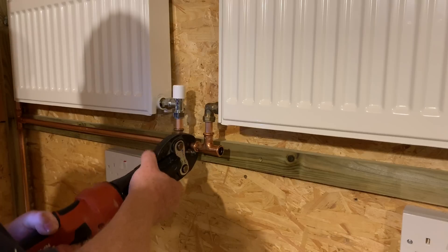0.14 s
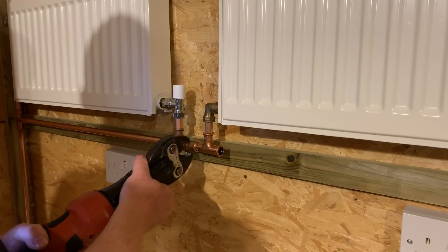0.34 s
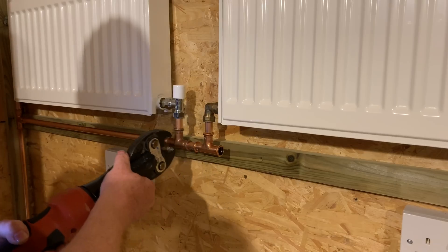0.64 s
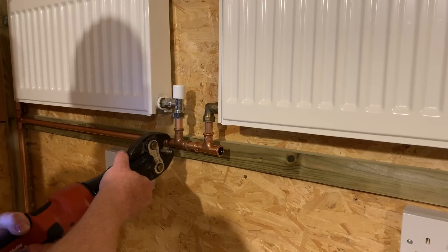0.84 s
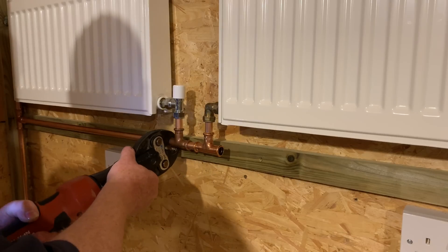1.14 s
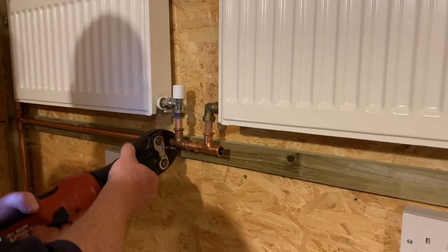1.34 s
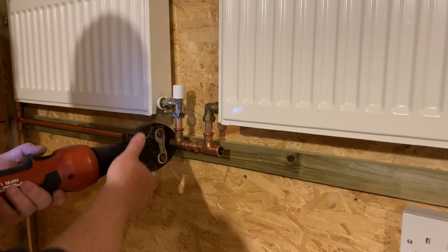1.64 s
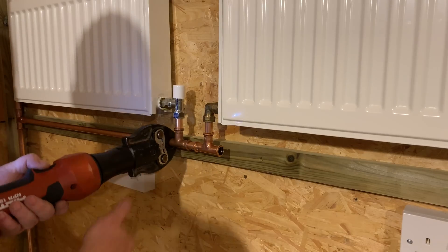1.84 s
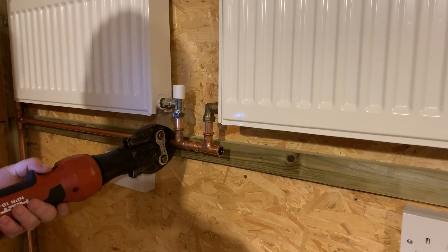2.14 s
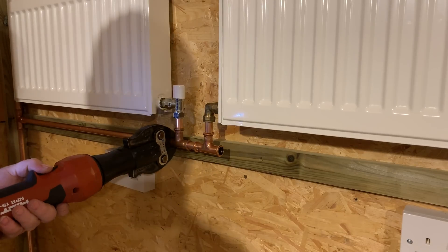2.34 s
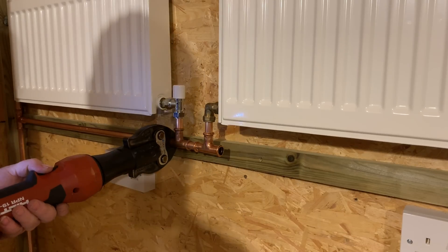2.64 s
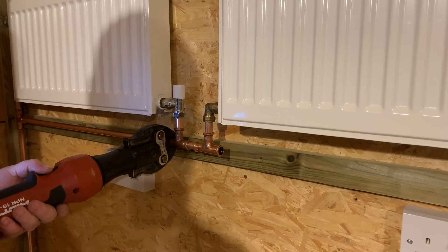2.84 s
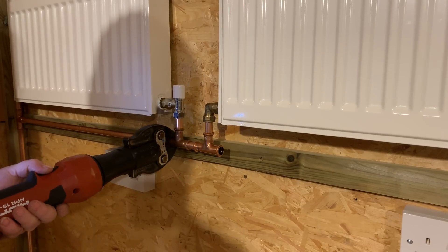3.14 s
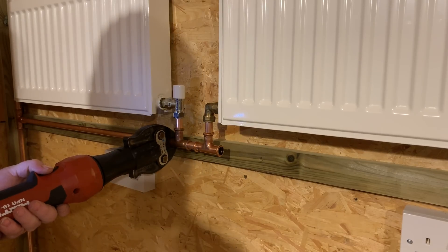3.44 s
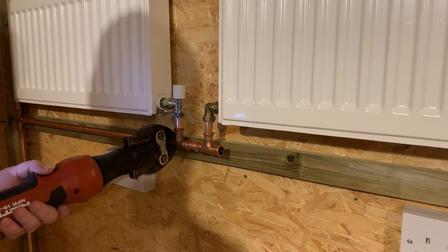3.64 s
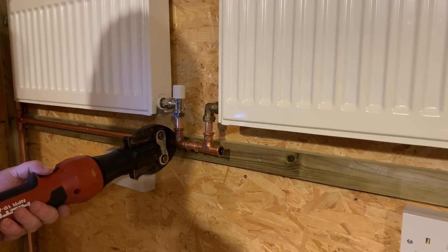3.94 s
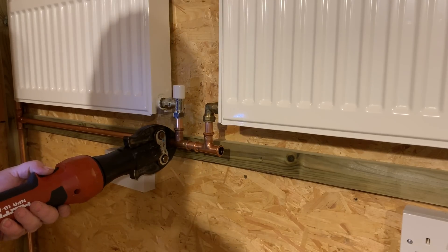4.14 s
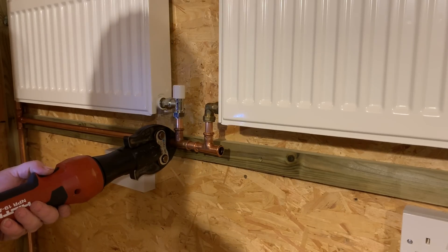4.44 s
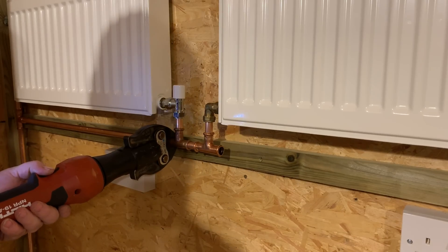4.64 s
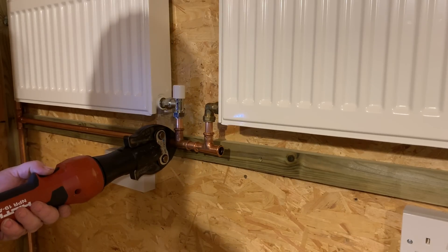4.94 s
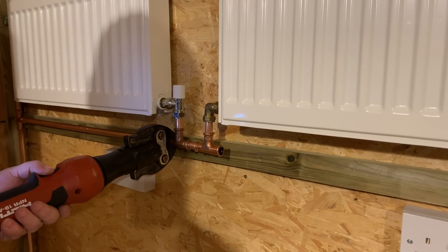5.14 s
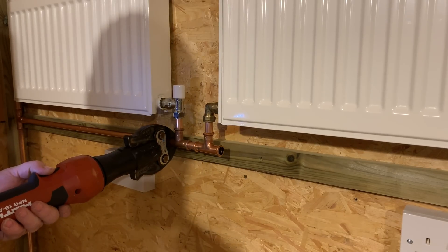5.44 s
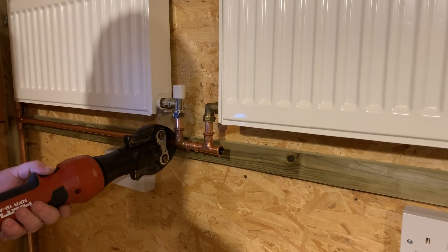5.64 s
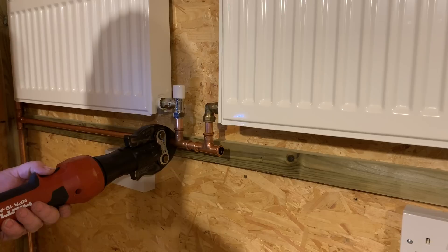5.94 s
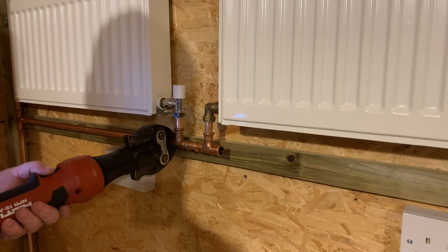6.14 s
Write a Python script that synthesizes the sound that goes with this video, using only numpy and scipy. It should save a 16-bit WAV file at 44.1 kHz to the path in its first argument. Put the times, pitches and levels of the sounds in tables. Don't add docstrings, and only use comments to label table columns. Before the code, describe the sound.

Hands rub and metal jaws knock onto copper pipe, then a battery press tool switches on and whirs with a rattling buzz, sagging under load.

```python
import sys
import numpy as np
from scipy import signal
from scipy.fft import rfft, irfft, next_fast_len
from scipy.io import wavfile
from scipy.ndimage import uniform_filter1d, map_coordinates

SR = 44100
rng = np.random.default_rng(int(sys.argv[2]) if len(sys.argv) > 2 else 0)


def volts_from_db(level):
    exponent = np.asarray(level, float) / 20
    return 10 ** exponent


def store_wav(level_fs):
    pcm = np.round(np.clip(np.atleast_2d(level_fs), -1, 1) * 32767)
    wavfile.write(sys.argv[1], SR, pcm.T.astype(np.int16))


N = 277389
T = np.arange(N) / SR

# time_s, turns_per_s
PUMP_SPEED = [(2.0, 42.83), (2.05, 56.81), (2.1, 67.45), (2.2, 68.0), (2.6, 68.0), (3.2, 67.82),
              (3.95, 67.24), (4.15, 66.36), (4.4, 66.02), (4.7, 65.96), (5.0, 65.38), (5.3, 65.33),
              (5.6, 64.85), (5.9, 65.04), (6.29, 63.82)]
# start_s, end_s
HUM_LOAD_S = [3.6, 5.4]
# multiple_of_pump_speed, light_db, loaded_db
PUMP_HUM = [(1.012, -32, -44), (2, -52, -43), (3.012, -41, -49), (4.004, -32.5, -48), (4.97, -43.5, -40),
            (5.997, -39, -31), (7.023, -41, -38.5), (7.89, -60, -62), (9, -44.5, -44.5), (10.17, -52, -40),
            (11, -44.5, -47), (12, -36.5, -38), (13, -51, -52), (14, -79, -50), (15, -46.5, -60),
            (16, -44, -52), (17, -68, -67), (18, -43, -50), (19, -39.5, -41), (20, -41, -43),
            (21, -81, -37), (22, -39, -74), (23, -49.5, -46.5), (24, -51, -49.5), (31, -39, -51),
            (34, -38.5, -40), (35, -36.5, -49), (46, -40, -43), (50, -38, -53)]
# pump_multiples_added_to_rotor_speed, light_db, loaded_db
ROTOR_HUM = [(-2, -71, -57), (-1, -45.5, -50.5), (0, -33.5, -30.5), (1, -38.5, -44), (2, -52.5, -39.5),
             (3, -47.5, -58), (4, -49, -37), (5, -67, -46), (6, -47, -45), (7, -46, -43), (8, -48, -51),
             (9, -48, -54), (11, -52, -74), (13, -56, -42.5)]
HUM_SURGES = {2: (4.75, 0.63, 7), 3: (4.7, .6, 7), 12: (4.36, 1, 4.5), 13: (4.85, 0.41, 21),
              16: (3.45, 0.27, 4.8), 19: (4.75, .35, 2)}
TOOTH_BLOWS = [
    (-.03, .045, 1.),
    (.19, .03, .35),
    (.41, .05, .5),
    (.75, .04, .12),
]
# pitch_hz, density_db_per_hz
CLATTER_FREE = [(88, -55), (150, -25.5), (266, -12.5), (316, -74), (369, -5.5), (513, -17.5), (833, -15.5),
                (940, -26), (1260, -15), (4460, -15.5), (7640, -14), (9400, -19), (12200, -41),
                (20700, -120)]
# pitch_hz, density_db_per_hz
CLATTER_LOADED = [(88, -25), (150, -23), (290, -17.5), (350, -6.5), (513, -10.5), (631, -7.5), (1450, -12),
                  (3570, -14.5), (4390, -9), (5790, -15), (7770, -12), (9400, -13.5), (12200, -45),
                  (20700, -120)]
# pitch_hz, density_db_per_hz
CLATTER_TOP = [(9750, -17), (10050, -35), (10900, -37), (11350, -29), (11750, -20), (12400, -18),
               (14000, -17), (15100, -20), (15400, -31), (15850, -33), (15950, -120)]
# pitch_hz, width_hz, level_db
FREE_RINGS = [(2050, 71, 14.5), (2327, 84, 10), (2980, 23, -16), (3284, 17, 8.5), (3940, 23, 3),
              (5120, 55, 8), (7650, 710, -2), (8030, 300, -10), (8470, 610, 12.5)]
# pitch_hz, width_hz, level_db
LOADED_RINGS = [(2050, 70, 0.5), (2550, 250, 6.5), (2978, 21, 1), (4310, 310, -3.5), (5050, 66, 3.5),
                (8030, 790, 4.5), (9200, 15, 3)]
# start_s, end_s, pitch_hz, width_hz, level_db
STRAINS = [(2.014, 2.21, 2100, 100, -39), (2, 2.18, 990, 270, -35), (2.03, 2.4, 3700, 100, -37),
           (3.04, 3.47, 600, 33, -38.5), (3.82, 4, 1008, 15, -38), (3.63, 4.12, 620, 140, -34.5),
           (3.9, 4.65, 1190, 370, -38), (3.95, 4, 2600, 270, -40), (4.3, 5.4, 2280, 100, -37),
           (5.7, 6.3, 1200, 13, -45), (5.5, 6.1, 650, 41, -42.5), (5.998, 6.7, 602, 34, -25.5),
           (5.97, 6.5, 1600, 13, -40), (6.3, 6.5, 512, 27, -35), (6.1, 6.3, 900, 36, -40)]
# pitch_hz, t60_s, rise_s, level_db
VALVE_RINGS = [(7680, .0095, .0012, 4), (7980, .011, .0012, -1), (8900, .01, .001, -16),
               (4500, .007, .0004, -5), (2600, .008, .0006, -11), (10000, .012, .0003, -22),
               (13200, .005, .0003, -14)]
# place_turns, level_db
VALVE_STROKES = [
    (-.075, 0),
    (.36, -8.5),
]
# time_s, level_db (relative to running)
SWITCH_ON = [
    (2.0, -59),
    (2.014, -24),
    (2.031, -28),
    (2.033, -3.5),
    (2.05, -6.5),
    (2.075, -1.5),
]
# time_s, half_length_s, depth_ratio, whine_db
STUMBLES = [
    (2.145, 0.062, 0.9, -12),
    (3.21, 0.058, .9, 3),
    (4.25, 1, 0.28, 3.5),
    (5.152, 0.32, 1, 1.5),
    (6.076, 0.11, 0.4, 5.5),
    (6.27, 0.26, 0, -23),
    (3.396, 0.17, 0.3, 5.5),
    (3.803, .28, 0.13, -1.5),
    (5.0, 0.15, 0, 0.5),
]
# time_s, peak_db, treble_db, centre_hz,
# scrape_s
KNOCKS = [(0.162, -34.5, -25, 780, 0.049), (0.23, -28, -2.5, 745, 0.008), (0.236, -18, -30, 840, 0.0082),
          (0.33, -44, -11, 891, 0.02), (0.593, -60, -3, 854, 0.038), (0.77, -44, -6, 900, 0.01),
          (0.779, -19.5, -14.5, 1000, 0.012), (0.811, -27.5, -15, 1000, 0.015),
          (0.844, -44, -7, 1070, 0.011), (0.909, -34, -15, 900, 0.008), (0.916, -16.5, -13, 806, 0.023),
          (0.944, -26.5, -8.5, 910, 0.015), (0.983, -31.5, -11, 760, 0.04),
          (1.013, -28.5, -14, 1010, 0.025), (1.082, -36.5, -9, 425, 0.0066), (1.125, -20, -21, 1010, 0.013),
          (1.142, -24, -14, 1000, 0.015), (1.185, -21, -13.5, 1150, 0.015), (1.25, -39, -9, 444, 0.025),
          (1.385, -39.5, -17, 800, 0.05), (1.485, -29, -14, 1000, 0.0089), (1.491, -21, -18, 950, 0.021),
          (1.54, -38, -10.5, 775, 0.037), (1.7, -57, -20, 1300, 0.05), (1.943, -64, -1, 410, 0.026),
          (1.963, -51.5, 0, 428, 0.015), (1.977, -64, 4, 438, 0.017)]
# pitch_hz, level_db, t60_s
PIPEWORK = [(270, -1, 0.96), (435.7, 4, 0.2), (582, 4, 0.26), (775, -10, 0.28), (840, 1.5, 0.12),
            (1004, -5.5, 0.29), (1108, 13, 0.033), (1263, -29, 5.0), (1335, -33, 1.3), (1600, -37, 0.33),
            (1706, -37.5, 2.6), (2105, -52, 5.0), (2580, -60, 0.2), (3040, -29, 0.63)]
# time_s, pitch_hz, level_db, t60_s
TINKS = [(.84, 8200, -47, .04), (.981, 8250, -54, .03), (.981, 7200, -58, .03), (1.057, 8250, -58, .03),
         (1.081, 4950, -43, 0.037), (1.081, 6230, -43, 0.044), (1.081, 4320, -51, .04),
         (1.185, 6600, -54, .04), (1.962, 3390, -56, .06), (1.5, 870, -43, 0.67), (1.5, 1293, -49, 0.71),
         (1.5, 1330, -53, 0.67), (1.5, 1560, -52, 0.64), (.24, 854, -42, 0.68)]
# peak_s, dull_db, bright_db, rise_s, fall_s
GRIPS = [
    (0.1, -63, -80, 0.51, 0.33),
    (0.3, -39, -47.5, 0.14, 0.27),
    (0.68, -78, -64.5, 0.43, 0.56),
    (0.97, -34, -51, 0.15, 0.37),
    (1.28, -37.5, -51, 0.37, 0.25),
    (1.4, -52.5, -65, .2, 0.34),
    (1.52, -42, -60, 0.05, 0.35),
    (2.05, -67, -67, 0.19, .1),
]
# pitch_hz, density_db_per_hz
RUB_DULL = [(59, -38), (100, 8), (183, -18), (210, 4), (309, -1), (506, -14), (1280, -17), (4000, -91),
            (5200, -84), (8800, -120)]
# pitch_hz, density_db_per_hz
RUB_BRIGHT = [(880, -46), (1500, -6), (2050, -10), (3230, -18.5), (3550, -16), (5340, -21), (12000, -43),
              (15600, -65), (22000, -120)]
# widest_s, pitch_hz, level_db, rise_s, fall_s
SWAYS = [(0.0, 46, -50, .1, 0.46), (0.3, 46.1, -29, 0.16, 0.19), (0.47, 56.9, -40.5, .15, 0.12),
         (0.62, 59.2, -48, .03, 0.062), (0.855, 45.8, -19.5, 0.082, 0.069), (0.99, 46.5, -26.5, .2, 0.13),
         (1.235, 42.4, -21, 0.14, 0.12), (1.37, 39.4, -39, .2, 0.38), (1.585, 39.7, -33.5, 0.16, 0.031),
         (1.68, 39.4, -39, 0.044, 0.14), (1.9, 41.3, -62, .3, 0.33), (2.11, 45.5, -28, 0.041, 0.033),
         (2.2, 49.4, -36, 0.19, 0.045), (3.31, 53, -28, 0.076, 0.056)]
# pitch_hz, t60_s
ROOM_DECAY = [(150, 0.1), (1000, 0.36), (3000, 0.14), (9000, 0.39)]
# pitch_hz, side_minus_mid_db,
# share_following_mid_ratio, angle_rad
PORTS = [(30, -51, 0.7, 14), (65, -11, 0, -5), (132, -6, 0.04, 6), (250, -13, 0.64, -6), (520, -5, 0.1, 3),
         (760, -2, 0.9, 1), (1302, -4.5, 1, 1.5), (1566, 1, 1, -9), (2145, 6.5, 1, -0.4),
         (2460, 3.5, 0.7, -1.5), (3120, 1.5, 0.25, -2), (3780, 0.5, 0.2, -1), (4650, -4.5, 0.2, -3.5),
         (5780, 3.5, 0.9, -16.5),
         (6500, -2, .3, -4.2), (6900, -20, .5, -4.2), (7600, -27, .5, -1.6), (7950, -18, .6, -1.6),
              (8300, -5, .8, -1.6), (9400, 4, .8, -1.6), (9750, 6, .8, -1.6), (10050, 24, .8, -1.6),
              (10900, 22, .8, 1.6), (11350, 13, .7, 1.6), (11750, 5, .4, 1.6), (12300, 0, .4, 1.6),
              (12600, -16, .3, 1.6), (14700, -16, .3, -1.4), (15100, -11, .3, -1.4), (15400, 4, .3, -1.5)]

FIRST_TURN = 0.33
GEAR_FREE, GEAR_LOADED = 5.497, 5.458
BITE_START_S, BITE_END_S = 3.1, 4.05
CATCH_S, CATCH_TICK, CATCH_FADE_S = 2.031, 4.0, 0.01
HUM_LATE_DB, HUM_SETTLE_S = -10, 0.15
CLATTER_DB, CLATTER_LOAD_DB = -20.5, 1.5
TICK, TICK_PER_S = 3.7, 0.05
RING_WIDTH_MIN_HZ = 140
KNOCK_T60_S = 0.31
GRIP_SPAN_DB, SWAY_SPAN_DB = -25.5, -27
BRIGHT_FASTER, BRIGHT_EARLY_S = 2.25, 0.028


def evened(x):
    return x / np.sqrt(np.mean(x ** 2) + 1e-20)


def curves(rows):
    s, *columns = np.transpose(rows)
    return [np.interp(T, s, column) for column in columns]


def read(points, hz, column=1):
    points = np.transpose(points)
    return np.interp(np.log(hz + 1), np.log(points[0] + 1), points[column])


def coloured(x, points, rings=(), ring_db=0.0):
    hz = np.fft.rfftfreq(len(x), 1 / SR)
    bumps = 0
    for f, width, db in rings:
        bumps += volts_from_db(ring_db + db) / (1 + (2 * (hz - f) / max(width, RING_WIDTH_MIN_HZ)) ** 2)
    return irfft(rfft(x) * volts_from_db(read(points, hz)) * (1 + bumps), len(x))


def slow(per_s):
    knots = rng.standard_normal(int(N / SR * per_s) + 3)
    return map_coordinates(knots, [T * per_s], order=3)


def swell(s, rise, fall):
    return np.maximum((s - T) / abs(rise), (T - s) / abs(fall))


def hush():
    colour = [(20, -37), (32, -9), (45, 22.0), (100, 12.5), (300, -39), (2000, -58), (16000, -64)]
    return volts_from_db(-52.5) * evened(coloured(rng.standard_normal(N), colour))


def tail(channels):
    hz, t, z = signal.stft(rng.standard_normal((channels, SR // 2)), SR, nperseg=128)
    decay = volts_from_db(-60 * t / read(ROOM_DECAY, hz)[:, None])
    out = signal.istft(z * decay, SR, nperseg=128)[1]
    return out / np.linalg.norm(out, axis=1, keepdims=True)


def stand():
    hz = curves(SWAYS)[0]
    power = 0
    for s, _, db, rise, fall in SWAYS:
        power += volts_from_db(db + SWAY_SPAN_DB * swell(s, rise, fall) ** 1.23) ** 2
    phase = 2 * np.pi * np.cumsum(hz) / SR + slow(per_s=35.0)
    return np.sqrt(power) * np.sqrt(2) * np.sin(phase)


def rubbing():
    dull, bright = 0, 0
    for s, dull_db, bright_db, rise, fall in GRIPS:
        dull += volts_from_db(dull_db + GRIP_SPAN_DB * swell(s, rise, fall))
        early = swell(s - BRIGHT_EARLY_S, rise, fall / BRIGHT_FASTER)
        bright += volts_from_db(bright_db + GRIP_SPAN_DB * early)
    dull = dull * evened(coloured(rng.standard_normal(N), RUB_DULL)) * volts_from_db(2.0 * slow(per_s=24.0))
    hiss = evened(coloured(rng.standard_normal(N), RUB_BRIGHT))
    return dull + bright * hiss * volts_from_db(0.83 * slow(per_s=12.4))


def tinkles():
    out, t = np.zeros(N), np.arange(SR // 2) / SR
    for s, hz, db, t60 in TINKS:
        ring = volts_from_db(db - 60 * t / t60) * np.sin(2 * np.pi * hz * t)
        out[round(s * SR):][:len(t)] += ring * np.minimum(t / 0.0018, 1)
    return out


def pipe_modes(t, centre_hz):
    modes = 0
    for hz, db, t60 in PIPEWORK:
        t60 = np.clip(t60 * 900 / (hz + 600), 0.03, 1.46 * KNOCK_T60_S)
        level_db = 0.5 * db - 5.9 * abs(np.log2(hz / centre_hz))
        modes += volts_from_db(level_db - 60 * t / t60) * np.sin(2 * np.pi * hz * t)
    return modes


def knocks():
    out, t = np.zeros(N + SR), np.arange(SR // 2) / SR
    tick_colour = [(1200, -55), (2500, 8.5), (5000, -1.5), (9000, -7.5), (10500, -31), (12500, -13.0),
                   (16000, -29)]
    for s, db, treble_db, centre_hz, scrape in KNOCKS:
        blow = rng.standard_normal(len(t)) * np.exp(-t / max(scrape, 0.001)) * np.minimum(t / 0.0035, 1)
        ring = signal.fftconvolve(blow, pipe_modes(t, centre_hz))[:len(t)]
        panel = rng.standard_normal(len(t)) * volts_from_db(-60 * t / KNOCK_T60_S) * np.minimum(t / 0.006, 1)
        panel = coloured(panel, [(100, -22), (centre_hz * 0.5, -6), (centre_hz, 0), (centre_hz * 1.43, -8),
                                 (centre_hz * 3.6, -26), (9000, -60)])
        tick = coloured(blow * (1 + 3 * np.exp(-t / 0.0012)), tick_colour)
        body = 0.85 * ring / abs(ring).max() + 0.77 * panel / abs(panel).max()
        knock = body + volts_from_db(treble_db + 4.0) * tick / abs(tick).max()
        fade = np.cos(np.pi * t)
        out[round((s - 0.002) * SR):][:len(t)] += volts_from_db(db) * fade * knock
    return out[:N]


def running():
    start_db, = curves(SWITCH_ON)
    on = np.maximum(T - CATCH_S, 0)
    upset, whine_db = 0, 0
    for s, half, depth, db in STUMBLES:
        dip = np.maximum(1 - swell(s, half, half), 0)
        upset += dip * depth
        whine_db += dip * db
    upset = np.clip(upset, 0, 1)
    pump_db = start_db + HUM_LATE_DB * np.exp(-on / HUM_SETTLE_S)
    rotor_db = pump_db + whine_db
    bite = np.interp(T, [BITE_START_S, BITE_END_S], [0, 1])
    clatter_db = start_db + CLATTER_DB + CLATTER_LOAD_DB * bite
    tick = (TICK + TICK_PER_S * on) * (1 - 0.11 * upset)
    tick += CATCH_TICK * np.exp(-on / CATCH_FADE_S) * (on > 0)
    repeat = np.clip(0.9 - 0.72 * upset, 0.65, 0.87)
    return pump_db, rotor_db, clatter_db, tick, repeat


def hum(table, pump, base, surges={}):
    out, load = np.zeros(N), np.clip((T - 2.6) / 0.24, 0.6, 1)
    for multiple, *db in table:
        multiple = round(multiple)
        waver = load * min(abs(multiple) / 6 + 0.094, 1.5)
        level_db = np.interp(T, HUM_LOAD_S, db) + 2.2 * waver * slow(per_s=10.0)
        if multiple in surges:
            s, half, surge_db = surges[multiple]
            level_db += surge_db * np.maximum(1 - swell(s, half, half) ** 2, 0)
        turns = base + multiple * pump + rng.random()
        out += volts_from_db(level_db) * np.sqrt(2) * np.cos(2 * np.pi * turns + 0.5 * waver * slow(per_s=9.0))
    return out


def worn_teeth(turns, renew_per_s, size=600):
    patterns = rng.standard_normal((60, size))
    age, at = T * renew_per_s, turns % 1 * size
    old, fade = age.astype(int), np.pi / 2 * (age % 1)
    now = map_coordinates(patterns, [old, at], order=3, mode="grid-wrap")
    later = map_coordinates(patterns, [old + 1, at], order=3, mode="grid-wrap")
    return np.cos(fade) * now + np.sin(fade) * later


def gear_drive(pump, rotor, tick, repeat):
    luck = volts_from_db(1.2 * rng.standard_normal((400, len(TOOTH_BLOWS))))[(pump + 0.15).astype(int)]
    blows = 0
    for k, (place, width, strength) in enumerate(TOOTH_BLOWS):
        distance = (pump - place + 0.5) % 1 - 0.5
        blows += strength * luck[:, k] * np.exp(-(distance / width) ** 2)
    blows = tick * blows
    pinion = np.sqrt(2) * np.cos(2 * np.pi * rotor)
    teeth = worn_teeth(pump, renew_per_s=2.5) + 0.45 * pinion * worn_teeth(pump, renew_per_s=2.4)
    teeth, fresh = evened(teeth), rng.standard_normal(N)
    loose = repeat * 0.4
    low = signal.lfilter(*signal.butter(1, 4000, "low", fs=SR),
                         np.sqrt(repeat) * teeth + np.sqrt(1 - repeat) * fresh)
    high = signal.lfilter(*signal.butter(1, 4000, "high", fs=SR),
                          np.sqrt(loose) * teeth + np.sqrt(1 - loose) * fresh)
    return (1 + 0.25 * blows) * low + (1 + 0.48 * blows) * high


def valve(pump, strength):
    strokes, t = np.zeros(N), np.arange(600) / SR
    for place, stroke_db in VALVE_STROKES:
        at = np.flatnonzero(np.diff(np.floor(pump - place)) > 0)
        luck = rng.standard_normal((len(at), 2))
        at = np.clip(at + (4 * luck[:, 0]).astype(int), 0, N - 1)
        strokes[at] = -volts_from_db(stroke_db + 1.3 * luck[:, 1])
    ping = 0
    for hz, t60, rise, db in VALVE_RINGS:
        ping += volts_from_db(db - 60 * t / t60) * np.sin(2 * np.pi * hz * t) * np.minimum(t / rise, 1)
    return signal.oaconvolve(strokes * strength, ping)[:N]


def strains(drive):
    out = np.zeros(N)
    for start, end, hz, width, db in STRAINS:
        arch = np.sin(np.pi * np.clip((T - start) / (end - start), 0, 1))
        out += volts_from_db(db) * arch * evened(signal.lfilter(*signal.iirpeak(hz, hz / width, SR), drive))
    return out


def tool():
    powered = T >= PUMP_SPEED[0][0]
    speed = curves(PUMP_SPEED)[0] * powered
    ratio = np.interp(T, [BITE_START_S, BITE_END_S], [GEAR_FREE, GEAR_LOADED])
    pump = np.cumsum(speed) / SR + FIRST_TURN
    rotor = np.cumsum(speed * ratio) / SR
    pump_db, rotor_db, clatter_db, tick, repeat = running()
    drive = gear_drive(pump, rotor, tick, repeat)
    load = np.clip((T - 3.1) / 1.7, 0, 1)
    free = evened(coloured(drive, CLATTER_FREE[:-2] + CLATTER_TOP, FREE_RINGS, ring_db=-11.5))
    loaded = evened(coloured(drive, CLATTER_LOADED[:-2] + CLATTER_TOP, LOADED_RINGS, ring_db=1.0))
    pings = valve(pump, 2.9 + 0.6 * load + 3 * np.exp(-abs(T - CATCH_S) / 0.05))
    clatter = volts_from_db(clatter_db) * ((1 - load) * free + load * loaded + pings) + strains(drive)
    lines = volts_from_db(pump_db) * hum(PUMP_HUM, pump, 0, HUM_SURGES)
    lines += volts_from_db(rotor_db) * hum(ROTOR_HUM, pump, rotor)
    return (clatter + lines) * powered


def two_ports(mid, reflections):
    size = next_fast_len(N + SR)
    hz = np.fft.rfftfreq(size, 1 / SR)
    early = rfft(reflections * np.exp(-np.arange(len(reflections)) / (0.07 * SR)), size)
    unlike = early / np.sqrt(uniform_filter1d(abs(early) ** 2, size=1500))
    pair = PORTS
    share = np.clip(read(pair, hz, column=2), 0, 0.8)
    ports = share * np.exp(1j * read(pair, hz, column=3)) + np.sqrt(1 - share ** 2) * unlike
    side = irfft(rfft(mid, size) * ports * volts_from_db(read(pair, hz)), size)[:N]
    return np.array([mid + side, mid - side])


def scene():
    room = tail(channels=2)
    hits = knocks() + tinkles()
    answer = volts_from_db(-8.0) * signal.fftconvolve(hits, room[0])[:N]
    mid = hush() + stand() + rubbing() + hits + answer + tool()
    return two_ports(mid, room[1])


def top_cut(x):
    return signal.sosfilt(signal.butter(12, 16000, fs=SR, output="sos"), x)


def record(dry):
    mix = np.clip(dry, -1, 1)
    return top_cut(mix)


dry = scene()
out = record(dry)
store_wav(out)
```